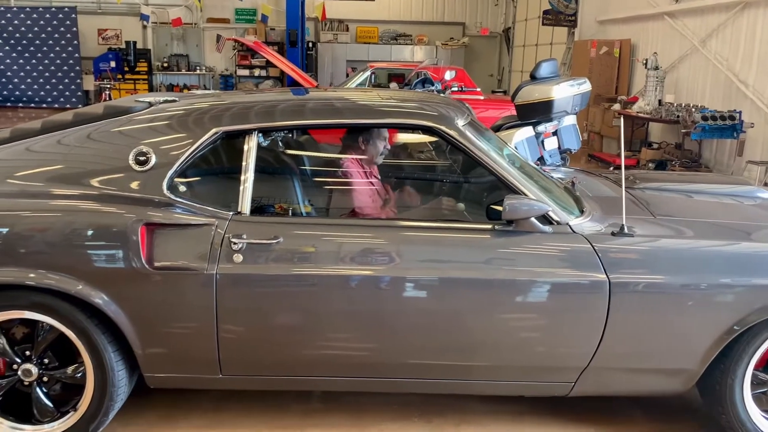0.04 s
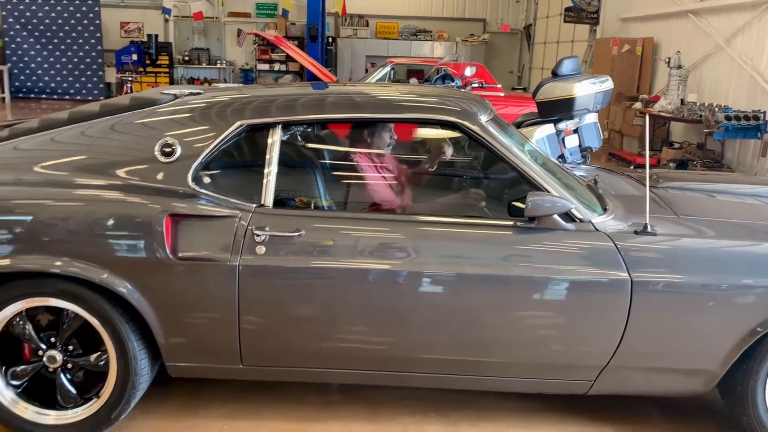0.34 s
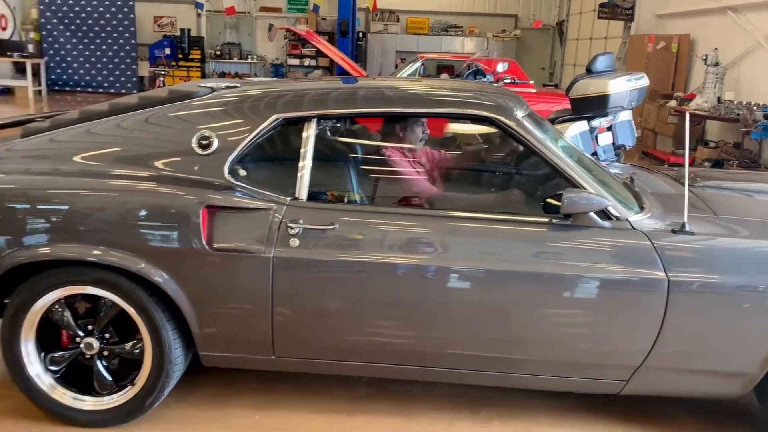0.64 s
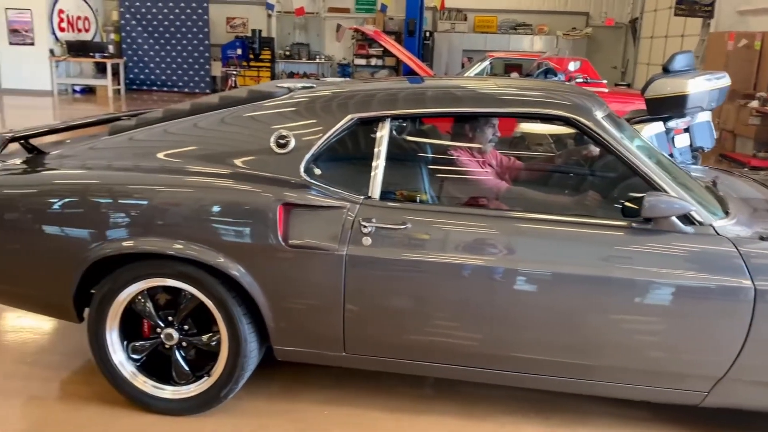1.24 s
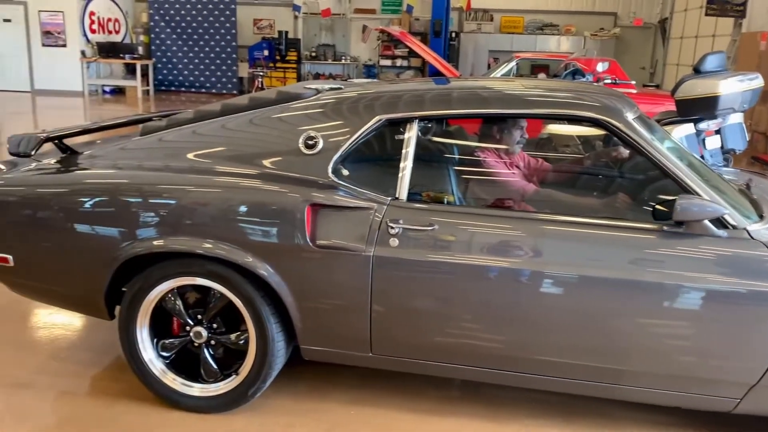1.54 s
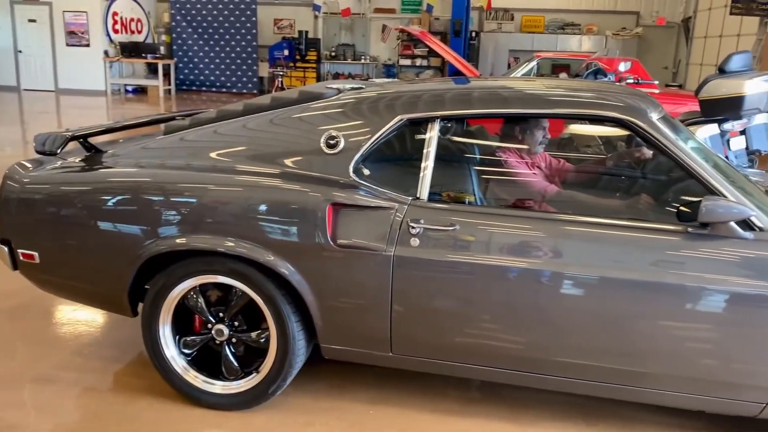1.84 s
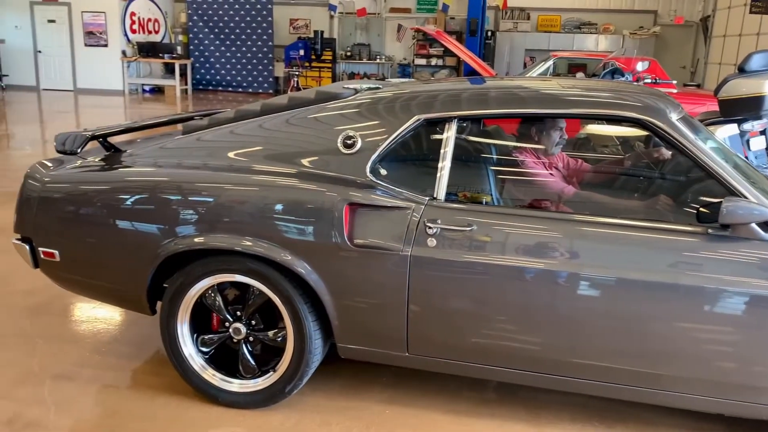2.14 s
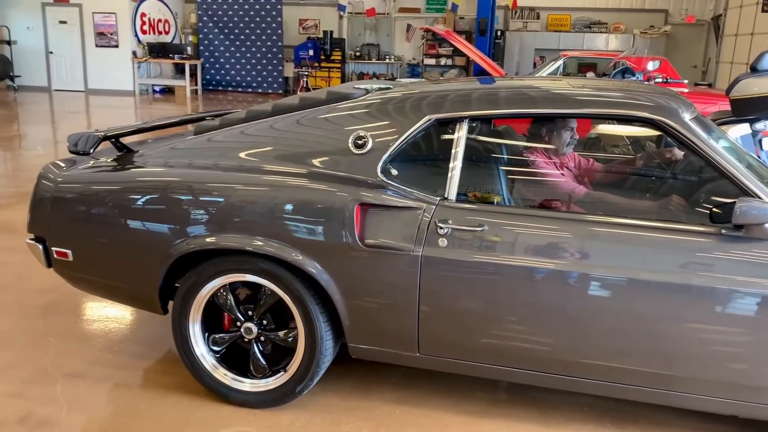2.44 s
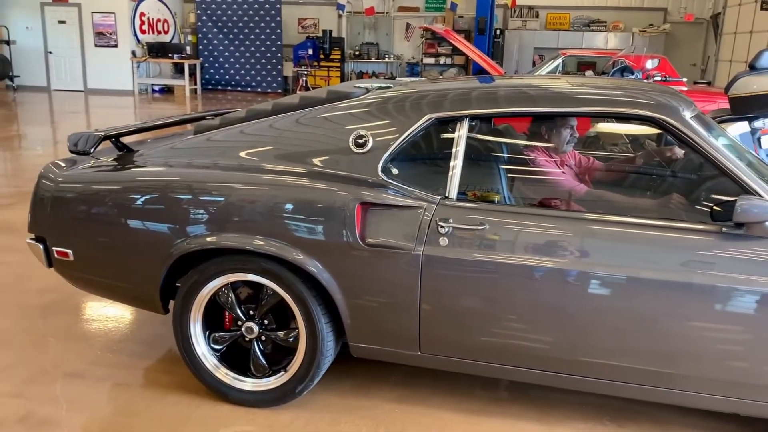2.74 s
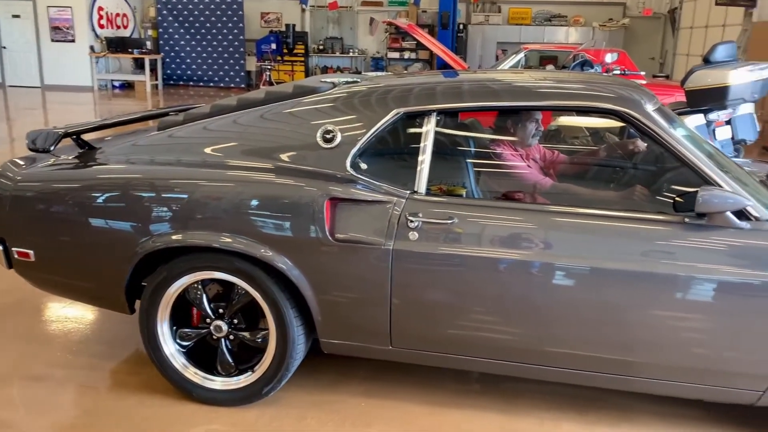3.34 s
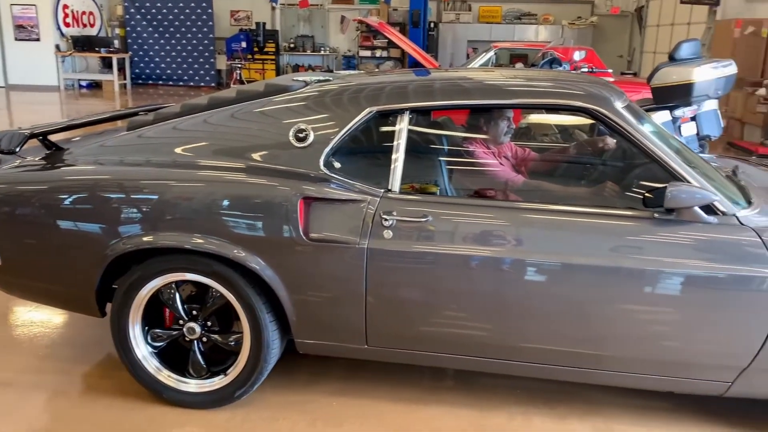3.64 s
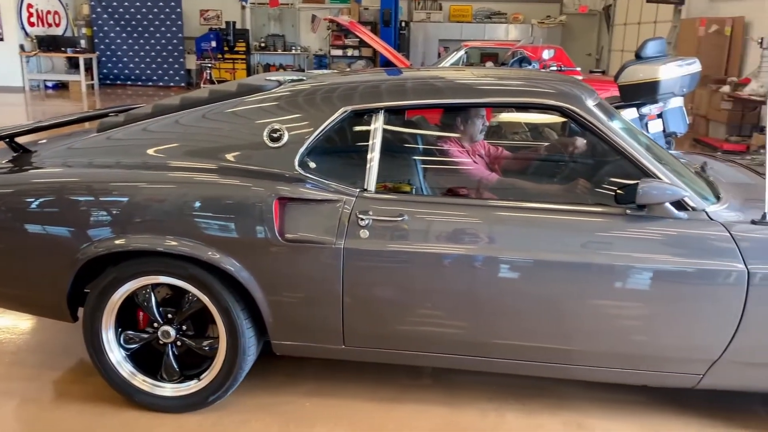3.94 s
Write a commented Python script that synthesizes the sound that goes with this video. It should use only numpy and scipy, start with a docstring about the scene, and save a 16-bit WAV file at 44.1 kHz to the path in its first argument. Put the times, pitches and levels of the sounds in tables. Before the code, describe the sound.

In an echoing garage, a big car engine chugs and throbs unevenly near the microphone. It swells with a raspy growl, settles, then swells again, with small exhaust spits and light valve ticking throughout.

```python
"""A big V8 in a garage

A V8 with a lumpy idle creeps through a workshop garage, and the throttle is blipped twice.
Uneven firings boom and rasp through the exhaust pipes. Hard ones chug and bark from the tailpipe
and spit, probably at a leaking gasket. The valves clatter, a faint whine probably comes from
the intake, metal squeaks once, and the hall echoes."""
import sys
import numpy as np
from scipy import signal
from scipy.io import wavfile
from scipy.ndimage import uniform_filter1d, minimum_filter1d

SR = 44100
rng = np.random.default_rng(int(sys.argv[2]) if len(sys.argv) > 2 else 0)


def wav_out(sig):
    """Save sig, one row per channel (or a flat mono array), as 16-bit PCM at SR to the path in sys.argv[1]."""
    wavfile.write(sys.argv[1], SR, np.round(np.clip(np.atleast_2d(sig).T, -1, 1) * 32767).astype(np.int16))


N = 176400
TIME = np.arange(N) / SR

# Levels are relative within each table. A ring time is how long a sound takes to fade by 60 dB.
# engine speed (time [s], firings per second [Hz])
FIRING_RATE = [(0, 46), (.4, 48), (.65, 52), (1.0, 51.2), (1.35, 46.1), (1.62, 51.4), (1.85, 48), (2.1, 49),
               (2.35, 49.9), (2.6, 46.7), (2.85, 49), (3.1, 49.6), (3.4, 54.9), (3.65, 57), (3.8, 53),
               (4, 46.3)]
# strength of each cylinder, in firing order (level [dB])
CYLINDER_LEVELS = [1.5, 4, -2, 7.5, 2.5, 5.5, 6, 0]
# notes the exhaust pipes ring with (pitch [Hz], level [dB], ring time [s])
PIPE_NOTES = [(73, -22, 0.12), (89.5, -19.5, 0.22), (92.7, -0.5, 0.096), (115.4, -11.5, 0.23),
              (128.5, -13, 0.17), (146, -14, 0.054), (196, -19.5, 0.15), (217, -15.5, 0.21),
              (315, -32, 0.21)]
# boom of the pipes (time [s], level [dB])
BOOM_LEVEL = [(0, -13), (.1, -23), (.3, -18), (.52, -19.5), (.6, -16.5), (.8, -22), (.95, -19.5),
              (1.1, -15), (1.2, -26), (1.45, -13.5), (1.66, -14), (1.95, -17), (2.2, -19.5), (2.42, -16.5),
              (2.6, -20.5), (3.1, -14), (3.5, -26), (3.75, -17), (4, -18)]
# deep throb of the mufflers (time [s], level [dB])
THROB_LEVEL = [(0, -4), (.1, -30), (.2, -29), (.31, -15), (.5, -26), (.6, -14), (.76, -16.5), (.92, -16.5),
               (1.1, -17.5), (1.5, -15), (1.8, -46), (2.1, -35), (2.21, -16), (2.4, -23), (2.55, -17.5),
               (3.03, -20.5), (3.5, -39), (3.68, -19), (4, -18)]
# drone of the pipes (time [s], level [dB])
DRONE_LEVEL = [(0, -21.5), (.1, -17.5), (.22, -18), (.42, -37), (.65, -24), (.9, -47), (1.12, -22.5),
               (1.22, -27), (1.6, -22), (1.95, -30), (2.28, -14.5), (2.45, -32), (2.7, -14.5),
               (2.85, -29.5), (3.18, -19), (3.5, -21), (3.7, -18.5), (4, -22.5)]
# tones in the drone (pitch [multiple of the eight-firing cycle rate], level [dB])
DRONE_TONES = [(13, -14.5), (16, -28), (19, 6), (21, -16.5), (24, -17.5), (32, -26.5), (37, -27)]
# heavy chugs from the tailpipe (time [s], level [dB])
CHUG_HITS = [(0.045, -5), (0.085, -5.5), (.133, -11), (.172, -5.5), (0.224, -12), (.361, -8), (.446, -9),
             (.583, -7), (.641, -6.5), (0.705, -6.5), (0.764, -8), (0.807, -8), (1, -9.5), (1.042, -6.5),
             (1.089, -7.5), (1.149, -6.5), (1.275, -6), (1.316, -7), (1.344, -7), (1.405, -4.5),
             (1.423, -9), (1.485, -5), (1.513, -4), (1.546, -5), (1.586, -6.5), (1.634, -0.5),
             (1.665, -4.5), (1.767, -7), (1.787, -14), (1.904, -9), (2.082, -7), (2.136, -5.5),
             (2.176, -5.5), (2.229, -3.5), (2.262, -3), (2.503, -6), (2.551, -5), (2.594, -4), (2.611, -10),
             (2.646, -7), (2.677, -9), (2.728, -6.5), (2.813, -10), (2.862, -4.5), (2.903, -2), (2.932, -3),
             (2.966, -5), (3.003, -3), (3.036, -2.5), (3.068, -5.5), (3.109, -5.5), (3.17, -0.5),
             (3.199, -9), (3.337, -5.5), (3.395, -6), (3.498, -8), (3.56, -7.5), (3.617, -7), (3.674, -6),
             (3.756, -1.5), (3.936, -0.5)]
# notes in a chug (pitch [multiple of the chug's pitch], level [dB], ring time [s])
CHUG_NOTES = [(0.998, 0, 0.078), (1.9, -16.5, 0.061), (2.7, -20, 0.07)]
# how hard the engine works, heard as exhaust rasp (time [s], level [dB])
THROTTLE = [(0, -23), (.41, -27), (.55, -25), (.72, -25), (.8, -22.5), (.9, -25.5), (1.05, -24.5),
            (1.35, -24.5), (1.5, -22.5), (1.6, -17.5), (1.66, -17), (1.72, -21), (1.8, -22.5), (1.9, -24.5),
            (2.1, -26), (2.22, -25), (2.44, -28), (2.52, -24), (2.72, -21.5), (2.84, -25), (2.94, -17),
            (3.16, -18.5), (3.31, -23.5), (3.53, -27), (3.8, -23), (4, -26)]
# tone of the rasp (frequency [Hz], level [dB])
RASP_TONE = [(100, -22), (170, -5.5), (240, -5), (330, -5.5), (390, -10), (430, 0.5), (470, -3),
             (525, -0.5), (575, -3), (634, -1.5), (675, -4), (715, -2.5), (760, -7), (785, -8), (825, -4),
             (860, -10.5), (898, -4.5), (965, -8), (1030, -7.5), (1400, -21.5), (2000, -24.5),
             (3200, -31.5), (6000, -36.5), (16000, -61)]
# low growl that opens up with the throttle (time [s], level [dB])
GROWL_SWELL = [(0, -19.5), (.3, -30.5), (.75, -25.5), (1.3, -25.5), (1.5, -20.5), (1.65, -13), (1.8, -21.5),
               (2.12, -26.5), (2.25, -23.5), (2.38, -31.5), (2.55, -21.5), (2.85, -22), (2.93, -11.5),
               (3.14, -13.5), (3.25, -18), (3.55, -25.5), (3.76, -19.5), (4, -24)]
# tone of the growl (frequency [Hz], level [dB])
GROWL_TONE = [(70, -12), (120, -15), (160, 1.5), (225, 1.5), (265, -2), (330, -1), (385, -11), (480, -21.5),
              (700, -29.5), (2000, -50), (16000, -79)]
# sharp barks from the tailpipe (time [s], crack level [dB], body level [dB])
BARK_HITS = [(0.765, -1.5, -19), (0.79, -6, -24), (1.041, -7, -11), (1.484, -15, -11), (1.583, 2, -7),
             (1.659, -3, -2), (2.263, -17, -2), (2.482, 1, 0), (2.547, -12, -6), (2.916, -8, -9),
             (2.959, 0, -6), (3.754, -13, 1), (3.851, -17, -10)]
# tailpipe notes in a bark's crack (pitch [Hz], level [dB], ring time [s])
CRACK_NOTES = [(430, -5, .06), (525, -3, .06), (634, 0, .07), (759, 0, .08), (898, -10, .05)]
# tailpipe notes in a bark's low body (pitch [Hz], level [dB], ring time [s])
BODY_NOTES = [(185, -5, .09), (240, 0, .11), (320, -3, .08)]
# spits of gas from the leak (time [s], level [dB])
SPIT_HITS = [(0.037, -26.5), (0.058, -39), (.139, -27), (0.342, -30), (0.495, -23.5), (0.551, -23),
             (.573, -28), (.618, -26), (0.633, -27), (0.691, -23.5), (.755, -27.5), (0.906, -28),
             (.982, -24), (1.031, -23.5), (1.054, -28.5), (1.075, -27.5), (1.136, -28), (1.262, -25.5),
             (1.29, -27), (1.324, -25.5), (1.389, -24.5), (1.414, -29), (1.47, -25.5), (1.517, -25),
             (1.562, -25), (1.6, -28), (2.126, -27.5), (2.165, -34), (2.218, -35), (2.426, -34),
             (2.472, -22.5), (2.494, -25), (2.537, -27.5), (2.581, -28.5), (2.631, -26.5), (2.68, -30),
             (2.783, -28.5), (2.851, -28), (2.89, -25), (3.624, -28.5), (3.665, -28.5), (3.729, -28.5),
             (3.842, -31), (3.948, -25)]
# blowing of the leak under load (time [s], level [dB])
BLOW_LEVEL = [(0, -26.5), (.4, -45.5), (1.1, -42), (1.42, -41), (1.52, -28), (1.63, -24), (1.75, -40.5),
              (2.08, -44), (2.22, -27.5), (2.4, -53), (2.7, -29), (2.83, -48), (2.92, -24), (3.1, -29.5),
              (3.3, -48), (3.58, -55), (3.7, -31), (4, -60)]
# tone of the leak (frequency [Hz], level [dB])
LEAK_TONE = [(300, -24), (1200, 2), (2500, -3), (4200, 0.5), (5500, -4.5), (6500, 1.5), (8500, 0.5),
             (10300, 3), (12000, -3), (13300, 9.5), (14600, -3), (16000, -18)]
# clatter of the valves (time [s], level [dB])
CLATTER_LEVEL = [(0, -31), (.8, -32), (1.5, -32), (2.0, -34), (2.4, -33), (3.1, -28.5), (3.55, -33),
                 (4, -30.5)]
# tone of the clatter (frequency [Hz], level [dB])
VALVE_TONE = [(300, 3), (1200, 6.5), (2250, 2), (2750, -1), (3200, -2.5), (3700, -2), (4050, 0), (4400, 1),
              (5200, -4), (6400, -1.5), (8600, -4), (10300, -2), (12000, -15), (13300, 3), (16000, -51)]
# notes of the engine's metal (pitch [Hz], width [Hz], level [dB])
METAL_NOTES = [(3030, 170, -5), (4590, 140, 0)]
# ring of that metal, lost as the bonnet moves away (time [s], level [dB])
METAL_FADE = [(0, -50), (1.2, -48.5), (1.8, -52), (4, -61)]
# thin whine, probably from the intake (time [s], pitch [Hz], level [dB])
WHINE_PATH = [(2.4, 3140, -63), (2.62, 3195, -44), (2.8, 3210, -44), (3.0, 3320, -42), (3.15, 3320, -47),
              (3.35, 3290, -70)]
# echo of the garage (frequency [Hz], ring time [s])
ECHO_TIMES = [(60, 0.87), (250, 0.23), (1000, 0.57), (4000, 0.36), (14000, 0.093)]


def firings(count=1):
    """The cylinders fire unevenly in time and strength; gives count clicks for each firing."""
    jitter_s, lump_db = .0012, 4.5
    fired = np.cumsum(curve(FIRING_RATE)) * count / SR
    times = TIME[1:][np.diff(np.floor(fired)) > 0]
    late, strong = rng.standard_normal((len(times), 2)).T
    levels = np.resize(CYLINDER_LEVELS, len(times)) + lump_db * np.clip(strong, -2, 1.5)
    return clicks(times + jitter_s * late, amp(levels))


def boom(train):
    """Firings ring the pipes and make the mufflers throb; the drone and the chugs join in."""
    push = unit(train) + 0.38 * puffs(train, decay_s=0.0048, floor=0.38)
    pipes = amp(curve(BOOM_LEVEL) + 2) * steady(conv(push, ring(PIPE_NOTES)), size=4000)
    pipes = signal.sosfilt(signal.butter(2, [55, 450], "bandpass", fs=SR, output="sos"), pipes)
    push = unit(train - train.mean()) + .6 * puffs(train, decay_s=0.0041, floor=0.37)
    muffler = ring([(47, 0, .28)])  # one deep note at 47 Hz
    throb = amp(curve(THROB_LEVEL) - 1) * steady(conv(push, muffler), size=4000)
    return garage((pipes + drone()) * lull() + chugs() + throb, wet_db=-22, pan_db=-1.76)


def drone():
    """The uneven firing order of the two cylinder banks hums as clean, gently wavering tones."""
    cycle = np.cumsum(curve(FIRING_RATE)) / len(CYLINDER_LEVELS) / SR
    tone = sum(amp(db - 2 * wander()) * np.sin(2 * np.pi * multiple * cycle + wander())
               for multiple, db in DRONE_TONES)
    return amp(curve(DRONE_LEVEL) + 6) * steady(tone)


def chugs():
    """The hardest firings stand out as short thumps, higher in pitch under throttle."""
    idle_hz, hz_per_db, scatter, rise_s = 117.9, 2.5, 0.047, 0.0037
    t, out, effort = TIME[:SR // 2], np.zeros(N + SR), curve(THROTTLE)
    pitch = idle_hz + hz_per_db * (effort - np.median(effort))
    swell = 1 - np.exp(-(t / rise_s) ** 2)
    for at, db in CHUG_HITS:
        start = round(at * SR)
        hz = pitch[start] * (1 + scatter * rng.standard_normal())
        thump = swell * ring([(k * hz, note_db, ring_s) for k, note_db, ring_s in CHUG_NOTES])
        out[start:start + len(t)] -= amp(db + 0.5) * thump / abs(thump).max()
    return out[:N]


def lull():
    """Ordinary firings weaken around each chug; gives their volume over time."""
    dip_db, lead_s, width_s = -7, 0.0021, 0.011
    t = TIME[::32]
    near = sum(np.exp(-((t - at + lead_s) / width_s) ** 2) for at, _ in CHUG_HITS)
    return np.interp(TIME, t, amp(dip_db * np.minimum(near, 1)))


def rasp(train):
    """Each firing leaves the tailpipe as a pop and a puff of gas over a low growl."""
    puff_s, noise_share = 0.0087, 0.86
    pops = unit(train) * (1 - noise_share) + noise_share * puffs(train, puff_s, floor=1)
    gas = colour(steady(pops, size=2600) * amp(curve(THROTTLE) + 0.5), RASP_TONE)
    growl = colour(unit(train) + puffs(train, puff_s, floor=1), GROWL_TONE)
    growl = amp(curve(GROWL_SWELL)) * steady(growl, size=3000)
    return garage(gas, wet_db=-0.5, pan_db=2) + garage(growl, wet_db=-16.5, pan_db=-2)


def barks():
    """A few firings burst from the tailpipe: a ringing crack, a low body and a puff of gas."""
    rise_s, decay_s = .003, 0.0075
    at, crack_db, body_db = np.transpose(BARK_HITS)
    crack, body = clicks(at, amp(crack_db)), clicks(at, amp(body_db))
    t = TIME[:SR // 2]
    swell = 1 - np.exp(-t / rise_s)
    bursts = conv(crack, swell * np.exp(-t / decay_s))
    gas = colour(bursts * rng.standard_normal(N), RASP_TONE)
    rings = conv(crack, swell * ring(CRACK_NOTES)) + conv(body, swell * ring(BODY_NOTES))
    return garage(rings + amp(-14) * gas, wet_db=-9, pan_db=1.5)


def leak(train):
    """Gas spits out at hard firings and blows in quick puffs under load."""
    rise_s, decay_s = .005, .008
    at, spit_db = np.transpose(SPIT_HITS)
    t = TIME[:SR // 5]
    shape = np.minimum(t / rise_s, 1) * np.exp(-np.maximum(t - 2 * rise_s, 0) / decay_s)
    power = conv(clicks(at, amp(spit_db + 2.5) ** 2), shape ** 2)
    spits = np.sqrt(abs(power)) * rng.standard_normal(N)
    blow = amp(curve(BLOW_LEVEL)) * puffs(train, decay_s=0.065, floor=0.97)
    return garage(colour(spits + blow, LEAK_TONE), wet_db=3.5, pan_db=-0.6, lag_s=.0002)


def clatter():
    """Valves tick twice for each firing over the rush of fan and belts, and set metal ringing."""
    taps = puffs(firings(count=2), decay_s=0.0028, floor=0.84)
    ticks = colour(taps, VALVE_TONE) * amp(curve(CLATTER_LEVEL) - 1)
    metal = sum(amp(db) * unit(resonate(taps, hz, width)) for hz, width, db in METAL_NOTES)
    return garage(ticks + metal * amp(curve(METAL_FADE)), wet_db=6.5, pan_db=0, lag_s=.0002)


def whine():
    """Air whistles thinly, rising as the throttle opens for the second time."""
    tone = unit(resonate(rng.standard_normal(N), curve(WHINE_PATH), width_hz=120))
    return garage(tone * amp(curve(WHINE_PATH, column=2)), wet_db=-14, pan_db=2)


def squeak():
    """Metal gives one brief, high ring."""
    at, hz, ring_s = .555, 6320, .08
    tap = clicks(np.array([at]), amp([-21]))
    return garage(conv(tap, ring([(hz, 0, ring_s)])), wet_db=-26, pan_db=-2)


def garage(x, wet_db, pan_db, lag_s=0):
    """The hall adds a smooth, diffuse echo (wet_db); pan_db above 0 leans left."""
    # three tails of fading noise for each ear, blended in turn so no stray note sticks out
    hz, t, noise = signal.stft(rng.standard_normal((2, 3, SR // 2)), SR, nperseg=256)
    fade = amp(-60 * t / read(ECHO_TIMES, hz)[:, None])
    tails = signal.istft(noise * fade, SR, nperseg=256)[1]
    tails /= np.linalg.norm(tails, axis=-1, keepdims=True)
    shares = np.sqrt(2 / 3) * np.cos(np.pi * (7 * TIME + np.arange(3)[:, None] / 3))
    echo = signal.fftconvolve((x * shares)[None], tails, axes=2)[..., :N].sum(1)
    direct = np.array([np.roll(x, round(lag_s * SR)), x])
    mix = (direct + amp(wet_db) * echo) / np.hypot(1, amp(wet_db))
    return mix * amp([[pan_db / 2], [-pan_db / 2]])


def puffs(train, decay_s, floor):
    """Noise that flares at each click, over a steady floor of hiss."""
    flare = conv(train, np.exp(-TIME[:SR // 5] / decay_s))
    return unit((floor + unit(flare)) * rng.standard_normal(N))


def ring(notes):
    """Fading notes sounding together, with a peak of 1."""
    t = TIME[:SR // 2]
    wave = sum(amp(db - 60 * t / ring_s) * np.sin(2 * np.pi * hz * t) for hz, db, ring_s in notes)
    return wave / abs(wave).max()


def resonate(x, hz, width_hz):
    """Keeps a narrow band around a pitch, which may glide."""
    turn = np.exp(2j * np.pi * np.cumsum(hz * np.ones(N)) / SR)
    r = np.exp(-np.pi * width_hz / SR)
    return 2 * (turn * signal.lfilter([(1 - r) ** 2], [1, -2 * r, r * r], x / turn)).real


def colour(x, tone):
    """Shapes lows and highs by a tone table, keeping attacks sharp (minimum phase)."""
    log_gain = np.log(amp(read(tone, abs(np.fft.fftfreq(4096, 1 / SR)))))
    kernel = np.fft.ifft(np.exp(np.conj(signal.hilbert(log_gain)))).real
    return conv(x, kernel / np.linalg.norm(kernel))


def steady(x, size=11025):
    """Evens out slow changes in level, keeping the single beats."""
    power = uniform_filter1d(uniform_filter1d(x ** 2, size), size // 2)
    return x / np.sqrt(abs(power) + 1e-12)


def wander(size=5000):
    """A slow random drift."""
    return unit(uniform_filter1d(uniform_filter1d(rng.standard_normal(N), size), size))


def clicks(times, sizes):
    """One-sample clicks at the given times."""
    return np.bincount(np.clip(np.round(times * SR), 0, N).astype(int), sizes, N + 1)[:N]


def conv(x, kernel):
    """Starts a scaled copy of the kernel at every sample of x."""
    return signal.fftconvolve(x, kernel)[:N]


def curve(table, column=1):
    """One column of a time table, sample by sample."""
    rows = np.array(table, float)
    return np.interp(TIME, rows[:, 0], rows[:, column])


def read(table, hz):
    """Looks up a frequency table on a log scale."""
    f, value = np.transpose(table)
    return np.interp(np.log(hz + 1), np.log(f + 1), value)


def amp(db):
    """Decibels to gain."""
    return 10 ** (np.asarray(db) / 20)


def unit(x):
    """Scales to an average power of 1."""
    return x / np.sqrt(np.mean(x ** 2) + 1e-20)


def scene():
    """One train of firings drives the exhaust and the leak; the other sounds join them."""
    train = firings()
    return boom(train) + rasp(train) + barks() + leak(train) + clatter() + whine() + squeak()


def record(dry):
    """Cuts the deepest rumble, turns loud peaks down and trims the highest treble."""
    low_hz, high_hz, ceiling = 34, 15900, .97
    cut = signal.sosfilt(signal.butter(8, low_hz, "highpass", fs=SR, output="sos"), dry)
    span = round(0.0015 * SR)
    gain = ceiling / np.maximum(abs(cut).max(0), ceiling)
    gain = uniform_filter1d(minimum_filter1d(gain, 2 * span), span)
    treble_cut = signal.firwin(511, high_hz, window=("kaiser", 9), fs=SR)
    return signal.oaconvolve(cut * gain, treble_cut[None], "same")


dry = scene()
out = record(dry)
wav_out(out)
```